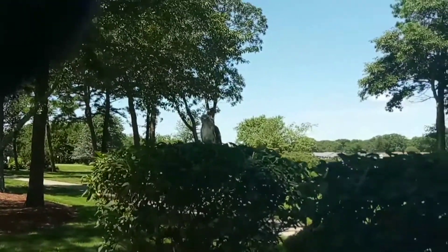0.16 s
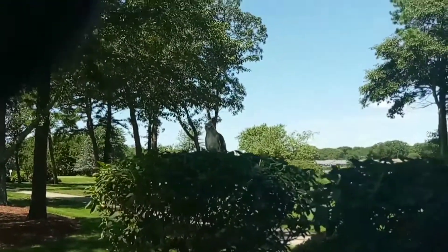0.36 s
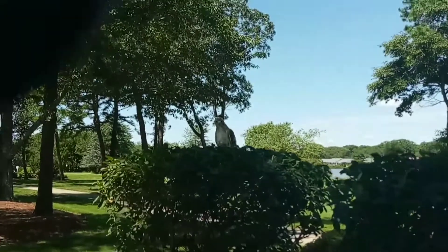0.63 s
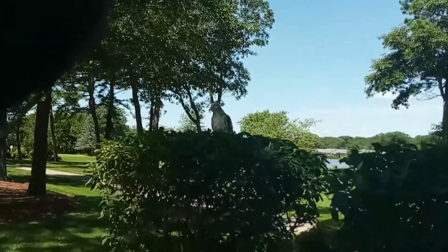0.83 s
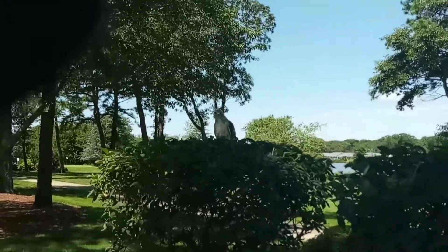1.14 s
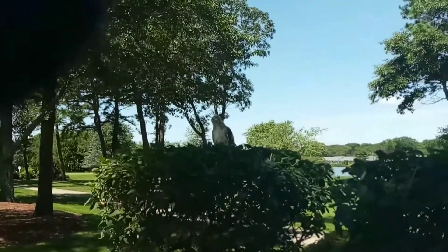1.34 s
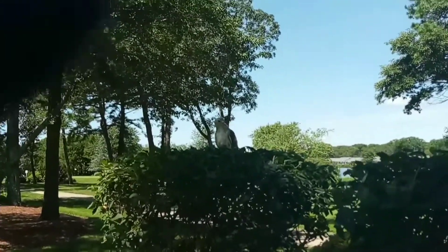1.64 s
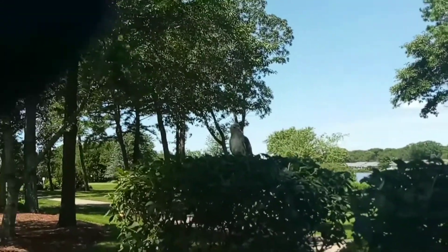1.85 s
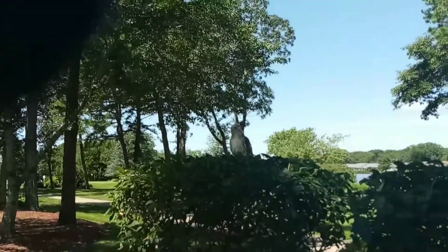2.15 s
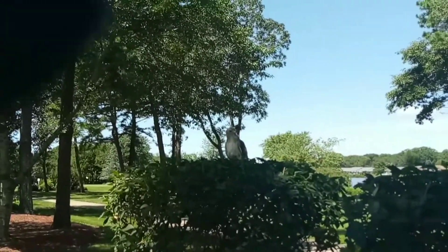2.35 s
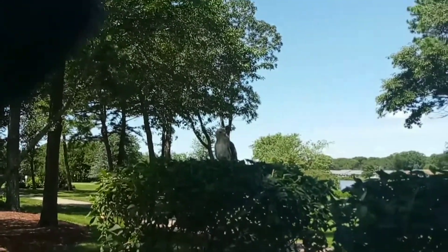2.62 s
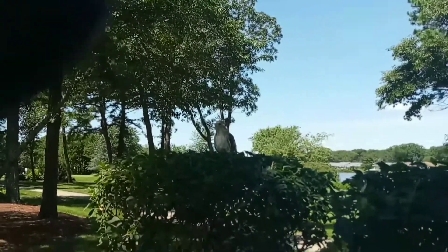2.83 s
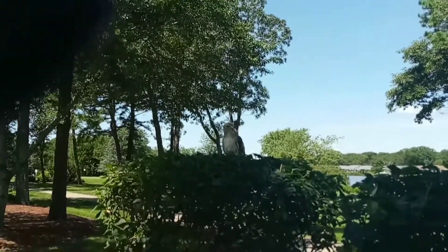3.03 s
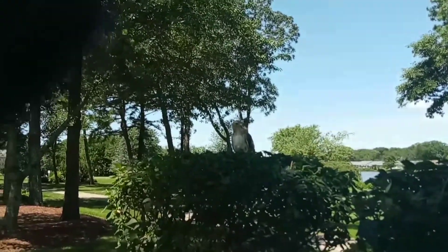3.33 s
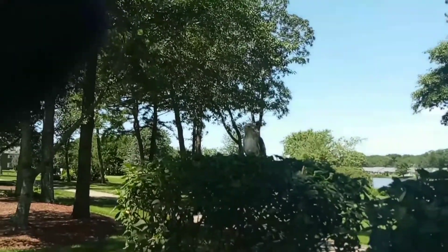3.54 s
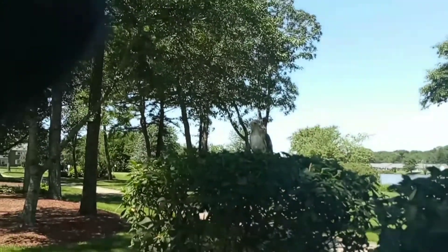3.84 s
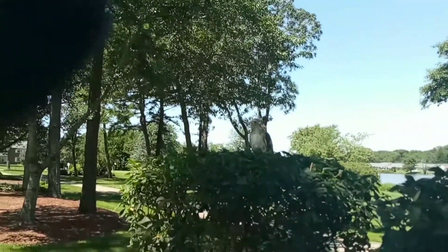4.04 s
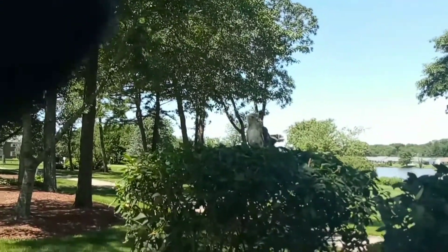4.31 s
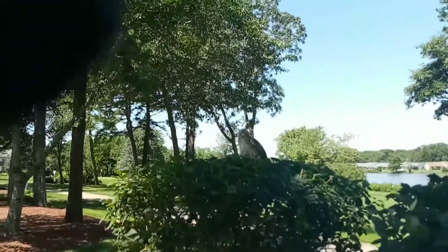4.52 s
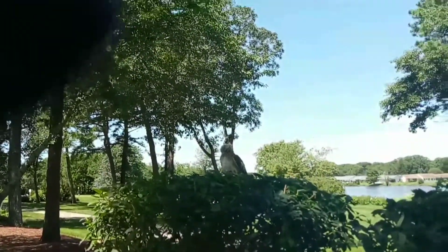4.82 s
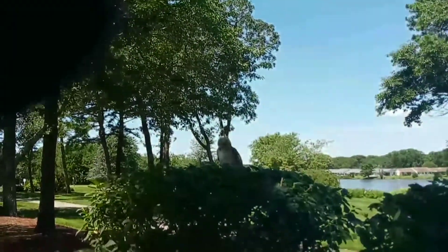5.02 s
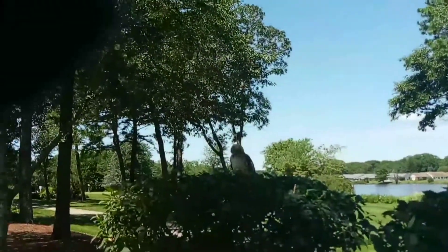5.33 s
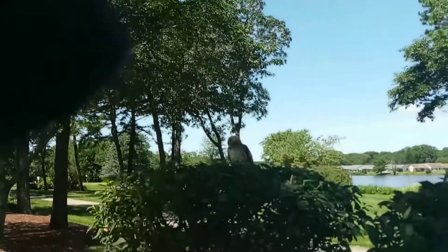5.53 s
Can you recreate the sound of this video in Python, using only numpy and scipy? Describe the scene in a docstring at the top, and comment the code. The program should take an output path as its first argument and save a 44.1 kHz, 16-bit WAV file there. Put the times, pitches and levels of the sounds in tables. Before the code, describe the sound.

A young hawk gives a falling whistle and five harsh screeches in a park, while a small bird chirps farther off over a low rumble.

```python
"""Young hawk screeching in a park

A young hawk gives five harsh screeches: fluttering noise through moving throat resonances.
The first opens as a clear falling whistle, a few sine partials that grow unsteady.
A small bird, made of jittering sines, chirps farther off among echoing trees of fading noise.
Coloured noise gives a low rumble, far traffic, leaves, a brief rustle and soft knocks.
A sharp tap is one filtered push; a distant motor joins as two humming partials.
"""
import sys
import numpy as np
from scipy import signal
from scipy.fft import rfft, irfft, next_fast_len
from scipy.io import wavfile
from scipy.ndimage import uniform_filter1d, map_coordinates

SR = 44100
rng = np.random.default_rng(int(sys.argv[2]) if len(sys.argv) > 2 else 0)


def store_wav(level_fs):
    """Save 16-bit WAV to argv[1]."""
    pcm = np.round(np.clip(np.atleast_2d(level_fs), -1, 1) * 32767)
    wavfile.write(sys.argv[1], SR, pcm.T.astype(np.int16))


N = 250047  # length of the scene in samples


def amp(db):
    """Turn decibels into a gain."""
    return 10 ** (np.asarray(db) / 20)


def unit(x):
    """Scale a sound to an average (rms) level of 1."""
    return x / np.sqrt(np.mean(x ** 2) + 1e-20)


def clock():
    """Give the time of every sample in seconds."""
    return np.arange(N) / SR


def since(start):
    """Count the seconds after a moment, zero before it."""
    return np.maximum(clock() - start, 0)


def until(end):
    """Count the seconds left before a moment, zero after it."""
    return np.maximum(end - clock(), 0)


def along(points, hz):
    """Read a curve of (Hz, value) points on a logarithmic frequency axis."""
    point_hz, values = np.transpose(points)
    return np.interp(np.log(hz + 1), np.log(point_hz + 1), values)


def curves(rows, t):
    """Read each column after the time column at the times t."""
    seconds, *columns = np.transpose(rows)
    return [np.interp(t, seconds, column) for column in columns]


def gate(start, end, rise, fall):
    """Open with soft edges: half open at start, starting to close at end and shut one fall time later."""
    t = clock()
    opening = np.clip((t - start) / rise + .5, 0, 1)
    closing = np.clip((end - t) / fall + 1, 0, 1)
    return opening * closing


def wobble(rate):
    """Draw a smooth random curve with this many random points a second."""
    points = rng.standard_normal(int(N * rate / SR) + 4)
    return map_coordinates(points, [clock() * rate])


def phase_of(hz):
    """Add up a pitch curve into a running phase."""
    return 2 * np.pi * np.cumsum(hz) / SR


def note(pitch, rough):
    """Make a sine of rms 1 whose pitch jitters."""
    jittered_hz = pitch * (1 + rough * wobble(600))
    return np.sqrt(2) * np.sin(phase_of(jittered_hz))


def filtered(x, response):
    """Multiply the spectrum of a sound by a response to frequency."""
    size = next_fast_len(N + SR // 2)
    spectrum = rfft(x, size) * response(np.fft.rfftfreq(size, 1 / SR))
    return irfft(spectrum, size)[:N]


def noise(colour):
    """Shape white noise into a colour, at rms 1."""
    return unit(filtered(rng.standard_normal(N), lambda hz: amp(along(colour, hz))))


def patchy(x, depth_db):
    """Give noise a slowly shifting, uneven colour, at rms 1."""
    z = signal.stft(x, nperseg=1024)[2]
    field = uniform_filter1d(rng.standard_normal(z.shape), size=4, axis=0)  # smooth over frequency
    field = uniform_filter1d(field, size=9, axis=1)  # smooth over time
    uneven = z * amp(depth_db * unit(field))
    return unit(signal.istft(uneven, nperseg=1024)[1][:N])


def echo(x, delay):
    """Copy a sound to a later time, as one reflection does."""
    return np.pad(x, (round(delay * SR), 0))[:N]


def trees(x):
    """Scatter a sound from trunks and foliage: a noise tail that fades at its own rate in each band."""
    # Each row: frequency in Hz, time for the echo to fade by 60 dB in seconds.
    fade_times = [(200, .3), (1500, 0.66), (4000, 0.63), (8000, .35)]
    hz, t, z = signal.stft(rng.standard_normal(SR), SR, nperseg=256)
    fading = z * amp(-60 * t / along(fade_times, hz)[:, None])
    tail = signal.istft(fading, SR, nperseg=256)[1]
    return signal.fftconvolve(x, tail / np.linalg.norm(tail))[:N]


def motor(second_db=-5.3):
    """A distant motor comes up to speed and hums on two partials."""
    start_s, rise_s, level_db = 3.55, .38, -47.9
    # Full speed, how far below it the motor starts, and how quickly it catches up.
    full_hz, slow_hz, spin_up_s = 118.3, 9.5, .5
    age = since(start_s)
    hz = full_hz - slow_hz * np.exp(-age / spin_up_s)
    phase = phase_of(hz * (1 + 0.00597 * wobble(8)))
    first = amp(2.2 * wobble(9)) * np.sin(phase)
    second = amp(second_db + 2.5 * wobble(7.7)) * np.sin(2 * phase)
    fade_in = 1 - np.exp(-age / rise_s)
    return amp(level_db) * fade_in * unit(first + second)


def background():
    """Low rumble and a motor's hum under far traffic and leaves: each noise has its own colour."""
    # Colours of the noises. Each row: frequency in Hz, level in dB.
    rumble_colour = [(20, -34), (35, -24), (52, -11.5), (72, -0.5), (120, 1), (170, -0.5), (220, -10.5),
                     (290, -17.5), (400, -28.5), (700, -57)]
    far_colour = [(200, -18.5), (450, -8.5), (620, -3.5), (850, 1), (1100, -3), (1500, -5.5), (2100, -17.5),
                  (4000, -35)]
    leaf_colour = [(800, -0.5), (2000, -1), (3500, 5.5), (4600, 0), (5400, 1.5), (6300, 6.5), (7000, -5.5),
                   (7600, -22.5), (8500, -18.5)]
    opening_colour = [(1500, -25.5), (2300, -7.5), (3200, 0.5), (4500, -7.5), (6500, -12.5), (8000, -35)]
    # Brief dips of the low end. Each row: start in seconds, start of the recovery in seconds, change in dB.
    lulls = [(0.238, 0.334, -11), (5.54, 5.67, -5)]
    rumble_db, rumble_swell_db = -52.5, 3.2
    far_db, far_swell_db = -59.5, 2
    leaf_db, leaf_swell_db = -66, 7
    opening_db, opening_fade_db_per_s = -57.5, 27.5

    # Rumble, traffic and leaves grow louder around 2.64 s and stay so.
    swell = (1 + np.tanh((clock() - 2.64) / 0.85)) / 2
    lull_db = sum(db * gate(start, end, rise=.02, fall=.02) for start, end, db in lulls)
    rumble_level = amp(rumble_db + rumble_swell_db * swell + 1.3 * wobble(9))
    rumble = rumble_level * patchy(noise(rumble_colour), depth_db=1.2)
    far_level = amp(far_db + far_swell_db * swell + .5 * wobble(3.82))
    far = far_level * patchy(noise(far_colour), depth_db=2.0)
    leaf_level = amp(leaf_db + leaf_swell_db * swell + 0.69 * wobble(6.2))
    leaves = leaf_level * patchy(noise(leaf_colour), depth_db=2.5)
    # A hiss that is already dying away at the start.
    opening_level = amp(opening_db - opening_fade_db_per_s * clock())
    opening = opening_level * patchy(noise(opening_colour), depth_db=2.5)
    return amp(lull_db) * (rumble + motor()) + far + leaves + opening


def chirp(start, hz):
    """Both sides of the syrinx sing at once: a level note that ends in a hoarse drop, and a rising one above."""
    # The low voice scoops up to its pitch, holds it, then drops and fades.
    scoop_octaves, scoop_s, hold_s = .06, 0.0062, .041
    drop_octaves, drop_s, drop_fade_db = .63, .029, 10.5
    # The high voice starts earlier and rises towards a ceiling.
    lead_s, high_length_s, high_rise_s = .017, 0.056, .013
    high_from_hz, high_to_hz, high_db = 4200, 6940, -12

    drop = np.clip(since(start + hold_s) / drop_s, 0, 1)
    octaves_down = scoop_octaves * np.exp(-since(start) / scoop_s) + drop_octaves * drop
    hoarse = np.interp(drop, [0, .3], [.005, .11])
    low = note(hz * 2 ** -octaves_down, hoarse) * amp(-drop_fade_db * drop)
    low = low * gate(start, start + hold_s + drop_s, rise=0.011, fall=.006)

    early = start - lead_s
    high_hz = high_to_hz - (high_to_hz - high_from_hz) * np.exp(-since(early) / high_rise_s)
    high = note(high_hz, rough=.022) * gate(early, early + high_length_s, rise=0.0087, fall=.008)
    return low + amp(high_db) * high


def peep():
    """A short note whose pitch rises and falls in an arch."""
    middle_s, half_s = 4.238, .026
    top_hz, arch_hz, level_db = 4390, 1005, -53.5
    pitch = top_hz - arch_hz * np.clip((clock() - middle_s) / half_s, -1, 1) ** 2
    opening = gate(middle_s - half_s, middle_s + half_s, rise=0.028, fall=.005)
    return amp(level_db) * note(pitch, rough=.015) * opening


def small_bird():
    """A small bird sings a row of like chirps and one peep."""
    # Each row: start in seconds, pitch in Hz, level in dB before the final mix.
    chirp_rows = [(.093, 4880, -53), (0.959, 4100, -47), (1.374, 4133, -47.5), (2.48, 4180, -48),
                  (3.917, 4190, -51.3), (4.293, 4234, -52.5), (5.24, 3950, -51)]
    return peep() + sum(amp(db) * chirp(start, hz) for start, hz, db in chirp_rows)


def rustle():
    """A short brushing sound: coloured noise made grainy by a fast random level."""
    # Each row: frequency in Hz, level in dB.
    rustle_colour = [(240, -44), (400, -14), (881, -4.5), (950, -9), (1180, -5.5), (1690, -6), (2150, -3),
                     (4490, -10), (6150, -1), (7510, -11.5), (8000, -34), (10400, -57), (17600, -120)]
    start_s, end_s, level_db = 4.431, 4.467, -39.4
    rise_db_per_s, fall_db_per_s = 1450, 320
    level = amp(level_db - rise_db_per_s * until(start_s) - fall_db_per_s * since(end_s))
    grains = noise(rustle_colour) * amp(1.8 * wobble(400))
    return level * unit(grains)


def knocks():
    """Dull bumps on the microphone: low noise that rises in a few milliseconds and dies quickly."""
    # Each row: time in seconds, level in dB, time to fade by 60 dB in seconds.
    knock_rows = [(3.321, -41.5, 0.064), (5.162, -36, 0.062), (5.188, -35, 0.076), (5.402, -38, 0.045)]
    # Each row: frequency in Hz, level in dB.
    knock_colour = [(60, -14), (200, 0), (350, 1.5), (600, -6.5), (1200, -9), (2500, -29), (6000, -56)]
    t = clock()
    level = np.zeros(N)
    for at, db, ring in knock_rows:
        onset = np.clip((t - at) / 0.0026 + 1, 0, 1)
        level += amp(db - 60 * np.abs(t - at) / ring) * onset
    return level * noise(knock_colour)


def tap(at=5.3995, peak_db=-21, size=8192):
    """One sharp tap on the housing: a single push with a low rebound."""
    # Each row: frequency in Hz, level in dB.
    tap_colour = [(30, -21), (90, -9), (300, 1), (500, 0.5), (900, -11), (2000, -14), (3000, -21),
                  (4500, -22.5), (8000, -39)]
    # Keeping half the cepstrum packs the colour's energy at the start (minimum phase).
    cepstrum = irfft(np.log(amp(along(tap_colour, np.fft.rfftfreq(size, 1 / SR)))))
    push = irfft(np.exp(rfft(2 * cepstrum[:size // 2], size)))
    push = amp(peak_db) * push / np.abs(push).max()
    return np.pad(push, (round(at * SR), N))[:N]


def whistle():
    """A clean falling tone swells, grows unsteady as the hawk presses harder, and fades into the screech."""
    # Each row: time in seconds, pitch in Hz before its random wobble.
    whistle_pitch = [(1.772, 2113), (1.78, 2122), (1.804, 1816), (1.82, 1604), (1.856, 1418), (1.89, 1346),
                     (1.914, 1284), (1.96, 1033)]
    # How the throat colours the partials. Each row: frequency in Hz, level in dB.
    throat = [(900, -34), (1400, -12.5), (1700, -5), (2100, -3.5), (2700, 4.5), (3300, 1), (3900, -14),
              (4300, -25), (5000, -33), (5600, -21), (6500, -32.5), (7500, -36), (8500, -50)]
    start_s, crest_s, end_s = 1.773, 1.875, 1.965
    level_db, swell_db_per_s, fade_db_per_s = -30, 116, 106

    pitch, = curves(whistle_pitch, clock())
    db = level_db - swell_db_per_s * until(crest_s) - fade_db_per_s * since(crest_s)
    strain = np.interp(clock(), [1.82, 1.93], [.006, .035])
    pitch = pitch * (1 + strain * wobble(500))
    phase = phase_of(pitch)
    orders = np.arange(1, 6)
    gains = np.array([amp(along(throat, k * pitch)) for k in orders])
    partials = np.sum(gains * np.sin(orders[:, None] * phase), axis=0)
    tone = partials / np.sqrt(np.sum(gains ** 2, axis=0) / 2)  # even power at every pitch
    level = amp(db + strain * 60 * wobble(200))
    return tone * level * gate(start_s, end_s, rise=0.012, fall=.01)


def resonate(source, centre_hz, width_hz, steep, skirt_db):
    """Pass a source through a moving throat resonance, at constant power."""
    # Colour of the harsh voice. Each row: frequency in Hz, level in dB.
    rasp = [(300, -36), (700, -24.5), (1000, -16), (1350, -8), (1750, -16), (2250, -5.5), (2650, 0),
            (3050, -0.5), (3500, 0), (4050, -2.5), (4550, 1.5), (5200, -2), (7300, 2.5), (9000, -5.5)]
    hz, t, z = signal.stft(source, SR, nperseg=256)
    offset = np.abs(hz[:, None] - np.interp(t, clock(), centre_hz))
    peak = 1 / (1 + (offset / width_hz) ** steep)
    skirt = amp(skirt_db) ** 2 / (1 + (offset / 1500) ** 4)
    gain = amp(along(rasp, hz))[:, None] * np.sqrt(peak + skirt)
    even_gain = gain / np.sqrt(np.mean(gain ** 2, axis=0))
    return signal.istft(z * even_gain, SR, nperseg=256)[1][:N]


def saturate(x, top):
    """The membranes cannot swing beyond a limit, which rounds off the tallest bursts."""
    height = np.abs(signal.hilbert(x, next_fast_len(N))[:N] / top)
    return unit(x / np.sqrt(1 + height ** 2))


def screeches():
    """Chaotic air, chopped by fluttering membranes, sounds two throat resonances over a faint, smeared pitch."""
    # Each row: start in seconds, length in seconds, attack in seconds, harshness from 0 to 1, flutter in Hz;
    # lower resonance: level in dB, sag in dB/s, centre in Hz, glide in Hz/s, overshoot at the start in Hz,
    # width in Hz; upper resonance: level in dB, centre in Hz, glide in Hz/s, width in Hz, flare time after
    # the start in seconds, flare in dB; then pitch in Hz, pitch fall in octaves/s, and lag of the nearest
    # reflection in seconds. Levels are before the final mix.
    screech_rows = [ (1.91, 0.17, .045, 0.36, 193, -32.5, 33, 2630, 5000, -3, 520, -60.5, 5900, 4499, 1300, 0.12, 5, 1233, 3.4, .0028),
                    (2.146, 0.37, .005, 0.2, 201, -24.6, 9, 2600, 3500, 1800, 660, -38.5, 6070, 300, 680, .02, 6, 1472, 1.1, .00634),
                    (2.704, 0.25, .04, 0.46, 176.8, -43, -1.5, 3420, 450, 0, 722, -60, 6540, 900, 1200, .23, 3.5, 998, .3, .00282),
                    (3.078, 0.38, 0.024, 0.48, 193, -33.5, -8, 3610, 1100, 0, 950, -38.5, 5460, 400, 866, 0.24, 8, 1022, .02, .00615),
                    (5.037, 0.22, 0.018, 0.57, 190, -31, 6, 3450, 500, 0, 480, -31, 5780, -1900, 380, 0.023, 2.5, 929, 0.31, .00225)]
    release_db_per_s = 501  # how fast a screech dies once the push ends
    flare_s = .055  # half the length of the upper resonance's flare
    overshoot_s = 0.046  # the lower resonance settles at this pace
    # The lower resonance's skirts in a smooth call, and their gain at full harshness.
    skirt_db, skirt_harsh_db = -28, 36.5
    # The fundamental under a screech of 0 dB, and its dB per dB of the screech.
    undertone_db, undertone_grows = -52, .24
    reflection_db = -10.5  # a nearby surface returns each call

    # Passing streaks in the rasp come from the uneven colour of the air noise.
    lower_air, upper_air = (patchy(rng.standard_normal(N), depth_db=1.8) for _ in range(2))
    calls = np.zeros(N)
    for (start, length, attack, harsh, flutter_hz,
         lower_db, sag, lower_hz, lower_glide, overshoot_hz, lower_width,
         upper_db, upper_hz, upper_glide, upper_width, flare_at, flare_db,
         pitch, fall, lag) in screech_rows:
        age = np.minimum(since(start), length)
        unsteady_hz = flutter_hz * (1 + .012 * wobble(25) + 0.061 * wobble(250))
        flutter = np.cos(phase_of(unsteady_hz))
        bursts = (1 + np.clip(harsh, 0, 1) * flutter) * amp(0.67 * wobble(300))

        lower_centre = lower_hz + lower_glide * age + overshoot_hz * np.exp(-age / overshoot_s)
        lower = resonate(bursts * lower_air, lower_centre, lower_width, steep=5.2,
                         skirt_db=skirt_db + skirt_harsh_db * harsh)
        upper_centre = upper_hz + upper_glide * age
        upper = resonate(bursts * upper_air, upper_centre, upper_width, steep=4.14, skirt_db=-16.5)
        flare = flare_db * np.exp(-((age - flare_at) / flare_s) ** 2)
        voice = amp(lower_db - sag * age) * saturate(unit(lower), top=2.3)
        voice += amp(upper_db + flare) * saturate(unit(upper), top=3.0)

        undertone_level = amp(undertone_db + undertone_grows * lower_db)
        undertone = undertone_level * note(pitch * 2 ** (-fall * age), rough=0.0454)
        rise = np.clip((clock() - start) / attack + .5, 0, 1)
        envelope = rise * amp(-release_db_per_s * since(start + length))
        call = envelope * (voice + undertone)
        calls += call + amp(reflection_db) * echo(call, lag)
    return calls


def scene():
    """The hawk is near; the small bird is far and its echo scatters in the tree line."""
    chirps = small_bird()
    answer = echo(amp(-13) * chirps + amp(-17) * trees(chirps), delay=.19)  # from the tree line
    far = amp(-1.0) * chirps + amp(-3) * trees(chirps) + answer
    clear = whistle()
    clear_reflection = amp(-10.5) * echo(clear, delay=.0063)
    near = amp(-.5) * screeches() + clear + clear_reflection + rustle()
    near_echo = amp(-16) * trees(near)
    return (near + near_echo + far + knocks() + tap() + background())[None]


def record(dry):
    """The microphone rolls off in the treble and keeps nothing above its band limit."""
    # Each row: frequency in Hz, level in dB.
    microphone = [(20, 0.5), (6500, -1), (7400, -4), (7900, -11.5), (8400, -25)]
    top_hz = 8500
    return filtered(dry[0], lambda hz: amp(along(microphone, hz)) * (hz < top_hz))[None]


dry = scene()
out = record(dry)
store_wav(out)
```